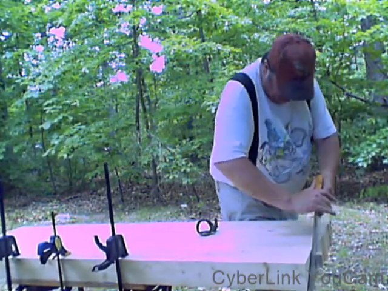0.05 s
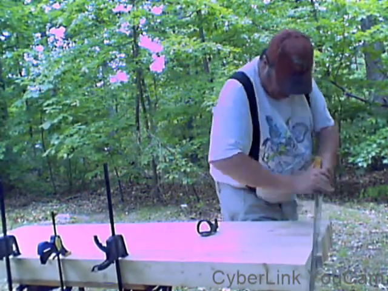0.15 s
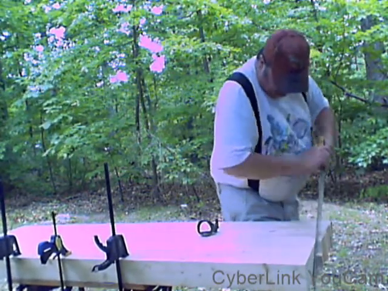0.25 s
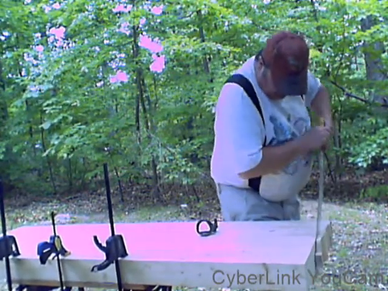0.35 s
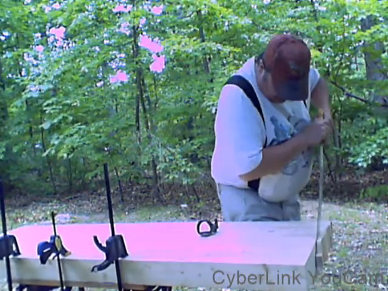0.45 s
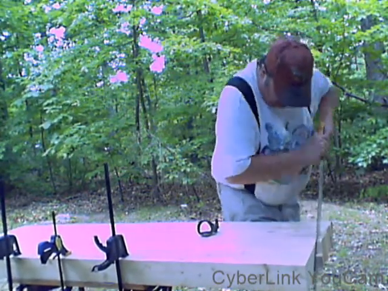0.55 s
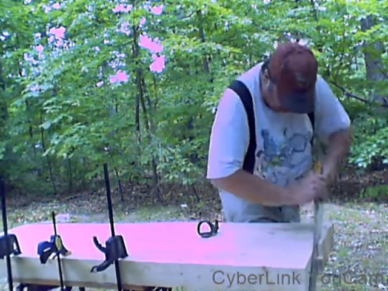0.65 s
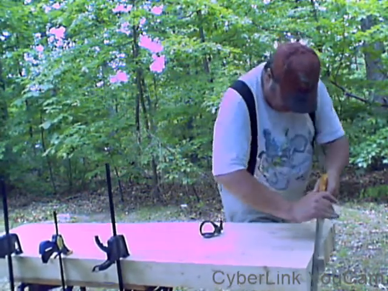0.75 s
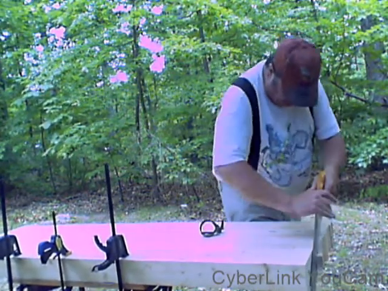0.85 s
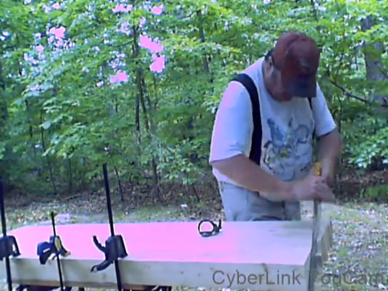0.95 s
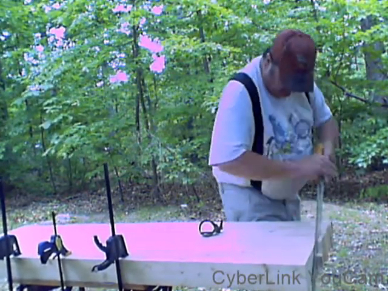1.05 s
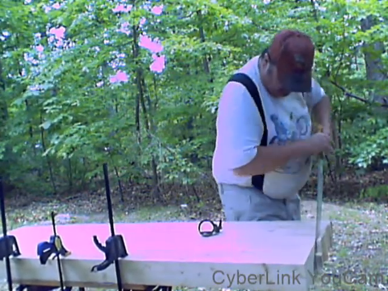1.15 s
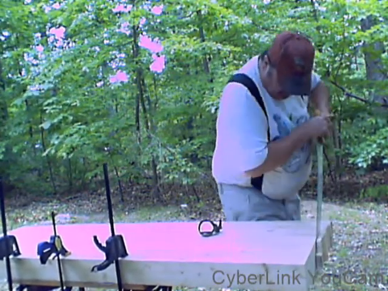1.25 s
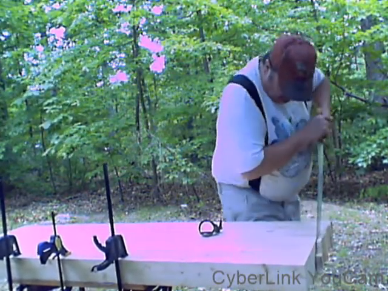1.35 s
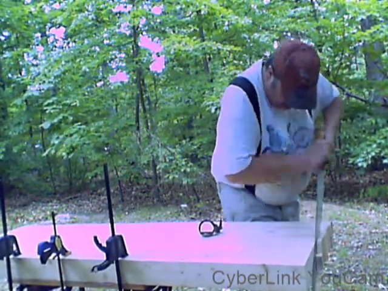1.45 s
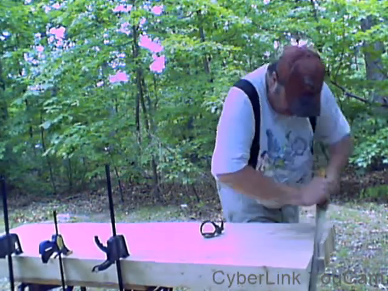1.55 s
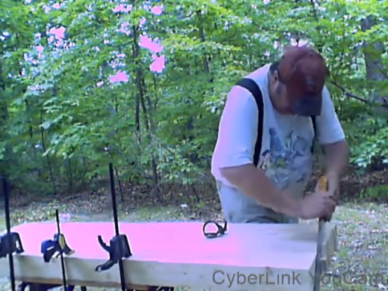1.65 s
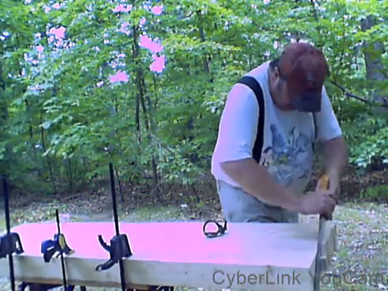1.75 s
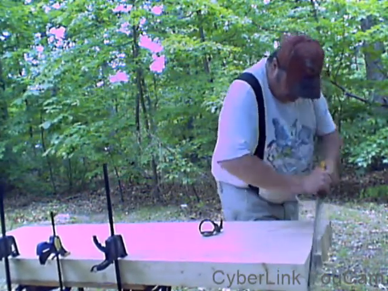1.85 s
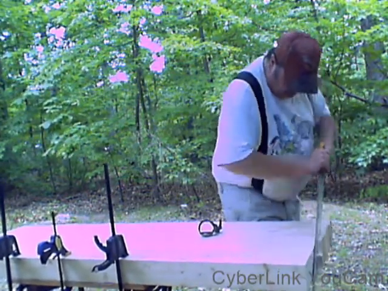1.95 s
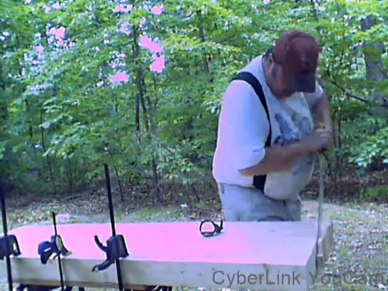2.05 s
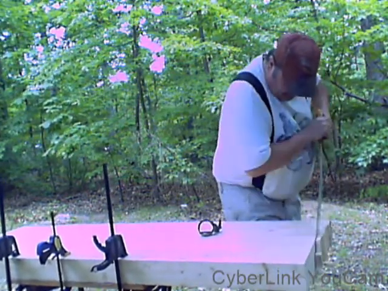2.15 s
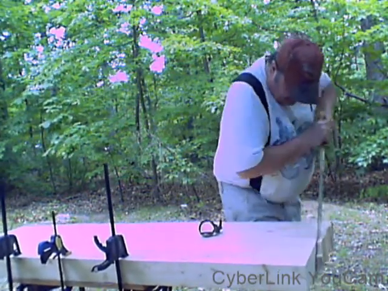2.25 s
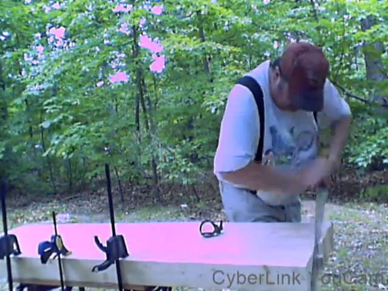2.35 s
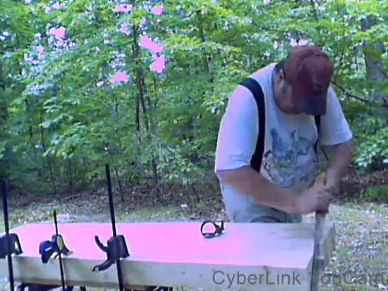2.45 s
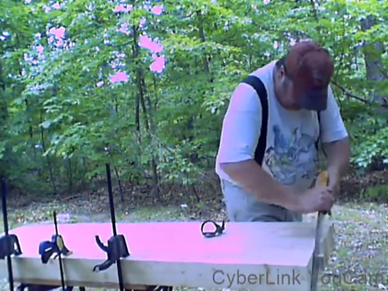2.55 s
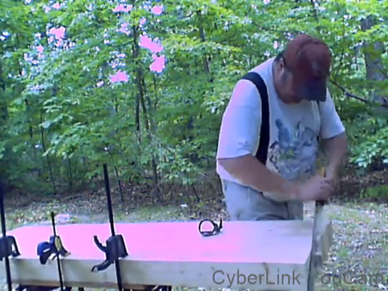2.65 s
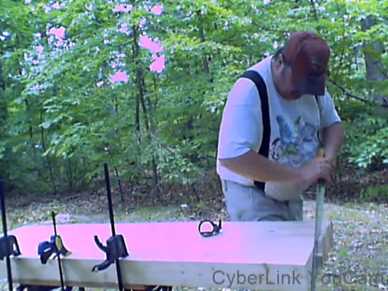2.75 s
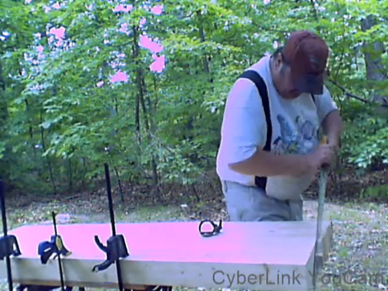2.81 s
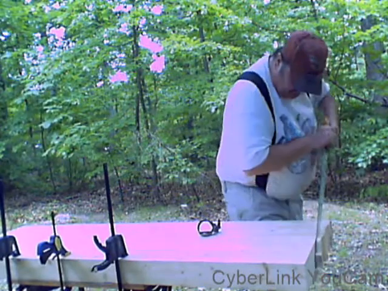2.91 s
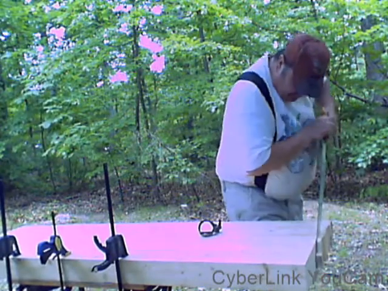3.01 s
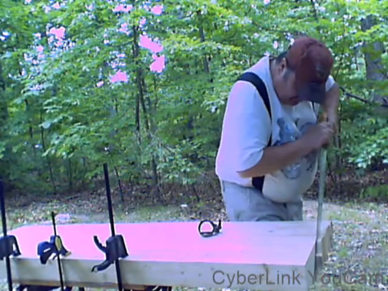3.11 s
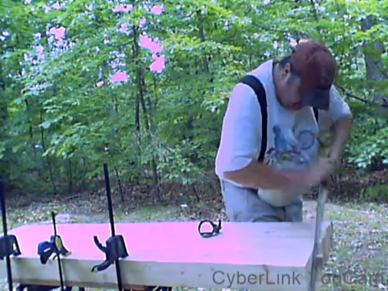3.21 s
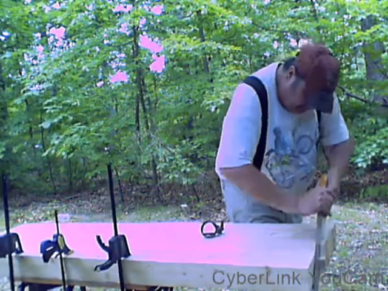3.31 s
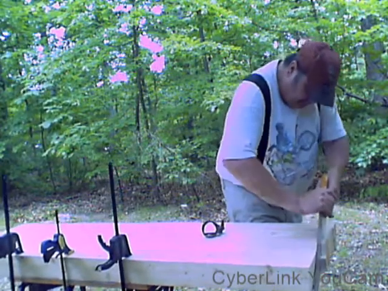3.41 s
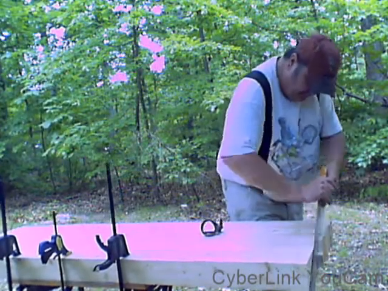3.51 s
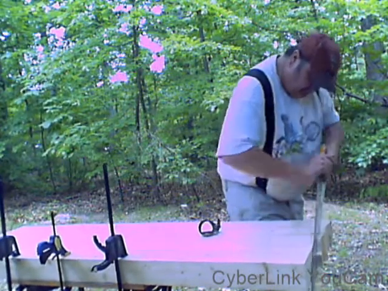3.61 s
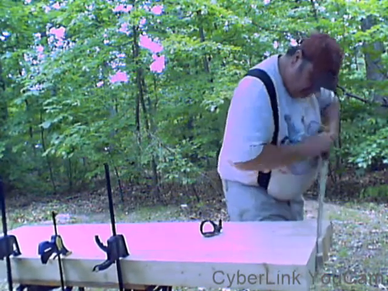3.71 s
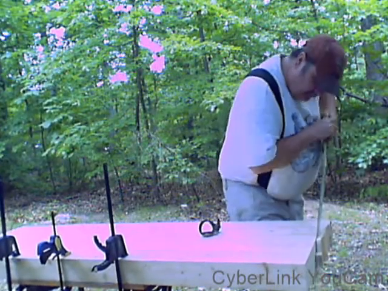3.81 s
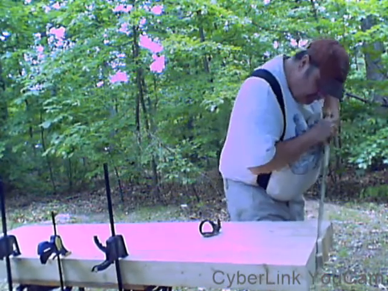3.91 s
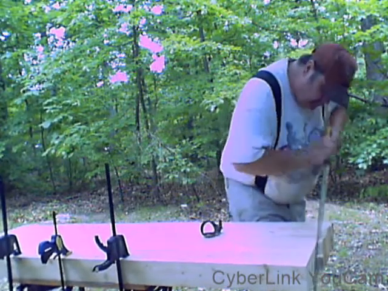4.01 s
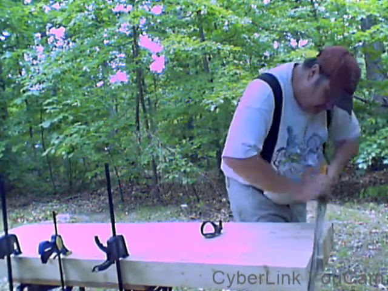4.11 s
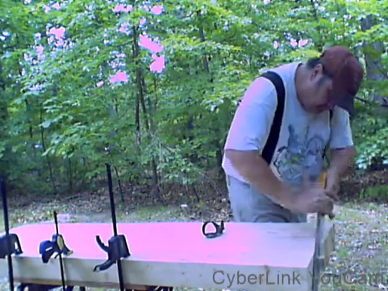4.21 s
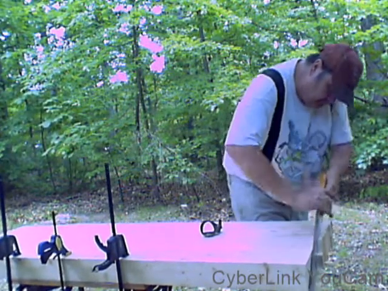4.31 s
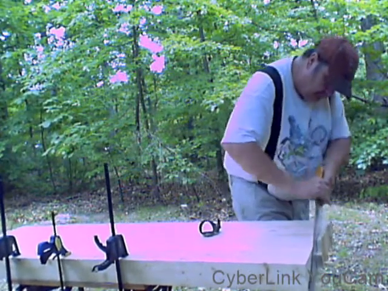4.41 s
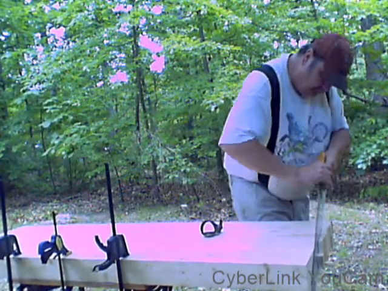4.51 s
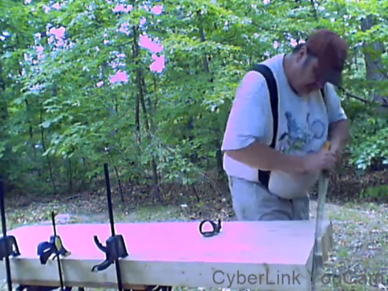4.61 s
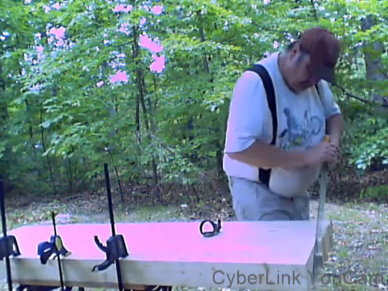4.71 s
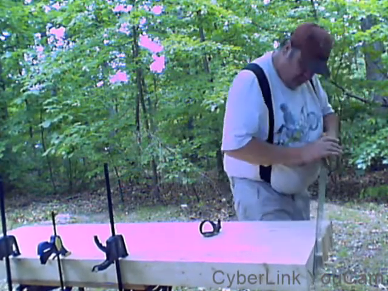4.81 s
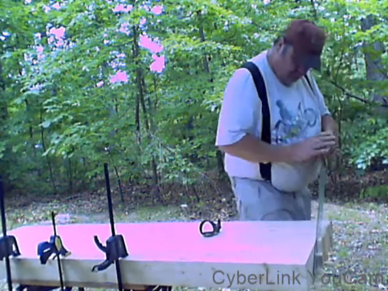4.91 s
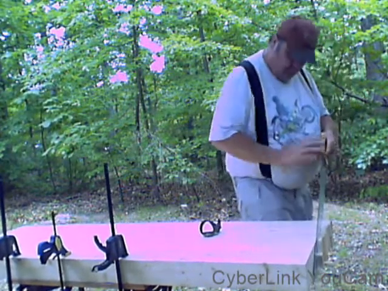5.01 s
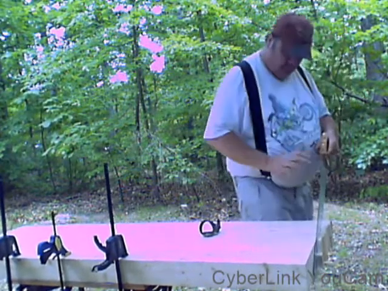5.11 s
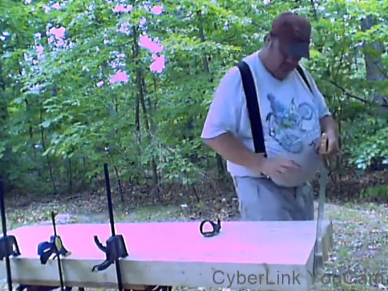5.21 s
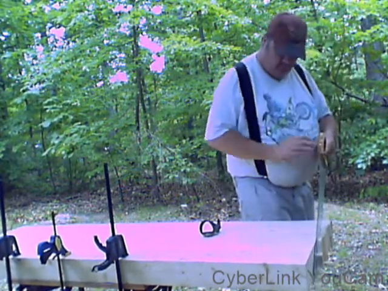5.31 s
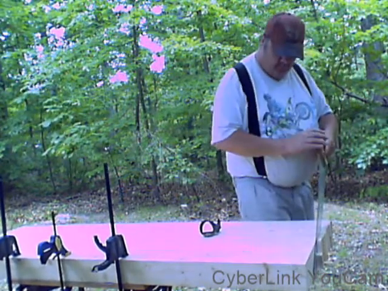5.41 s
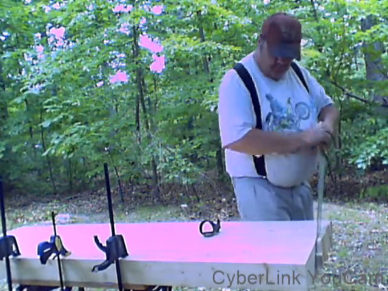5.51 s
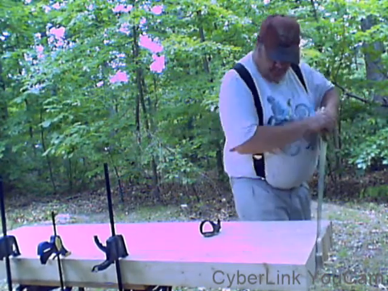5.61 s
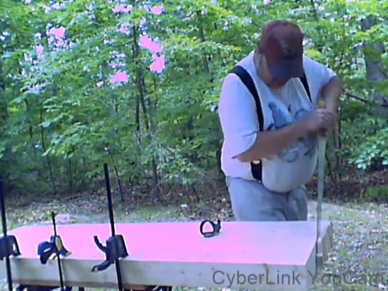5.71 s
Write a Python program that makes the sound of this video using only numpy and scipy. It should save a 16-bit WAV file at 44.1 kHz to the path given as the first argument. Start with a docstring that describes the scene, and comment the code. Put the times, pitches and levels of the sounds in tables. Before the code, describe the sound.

Over soft outdoor air noise and a low hum, a handsaw works back and forth in thick wood, a little more than once a second. Each push bites and makes the slab resonate; each pull skates back more quietly. Brief chattering tones, a few metallic knocks and two small squeaks mark the strokes. The saw stops for a moment before a last weak pull. The sound is mono, with dulled highs and almost no echo.

```python
"""A handsaw crosscuts a thick wooden slab outdoors, over steady air noise and a low hum; small mono mic.
It opens on the end of a push: teeth bite, tear fibres and set the slab ringing. On the pull they skate
back more lightly. Strokes repeat about every 0.86 s, chatter swelling into short groans of the slab.
From 0.9 s the blade knocks in the kerf at some turns, loudest at 3.6 s; near 2.3 and 4.4 s it squeaks.
At 5 s the sawyer rests briefly, then starts one more faint pull."""
import sys
import numpy as np
from scipy import signal
from scipy.fft import rfft, irfft, next_fast_len
from scipy.io import wavfile
from scipy.ndimage import uniform_filter1d

SR = 44100
rng = np.random.default_rng(int(sys.argv[2]) if len(sys.argv) > 2 else 0)


def generate_wav(sig):
    """Save sig (samples, or channels by samples) to the path in sys.argv[1] as 16-bit PCM at SR."""
    pcm = np.round(np.clip(np.atleast_2d(sig).T, -1, 1) * 32767).astype(np.int16)
    wavfile.write(sys.argv[1], SR, pcm)


N = 254012
T = np.arange(N) / SR


def from_db(db):
    """Decibels to gain."""
    return 10 ** (np.asarray(db) / 20)


def unit_rms(x):
    """Scale to rms 1."""
    return x / np.sqrt(np.mean(x ** 2) + 1e-20)


def drift(rate_hz):
    """Random wander through rate_hz knots per second; rms 1."""
    knots = rng.standard_normal(2048)
    return unit_rms(np.interp(T * rate_hz, np.arange(len(knots)), knots, period=len(knots)))


def swell(centre_s, half_s):
    """Raised-cosine rise and fall."""
    return np.cos(np.pi / 2 * np.clip((T - centre_s) / half_s, -1, 1)) ** 2


def colour(x, spectrum):
    """Filter by a curve of (frequency [Hz], level [dB]); rms 1."""
    hz, db = np.transpose(spectrum)
    size = next_fast_len(N)
    bins_hz = np.maximum(np.fft.rfftfreq(size, 1 / SR), 1)
    gain = from_db(np.interp(np.log(bins_hz), np.log(hz), db))
    return unit_rms(irfft(rfft(x, size) * gain, size)[:N])


def resonate(x, modes):
    """Parallel modes (frequency [Hz], width [Hz], level [dB]), signs alternating; rms 1."""
    out = np.zeros(N)
    for k, (hz, width_hz, db) in enumerate(modes):
        r = np.exp(-np.pi * width_hz / SR)
        mode = signal.lfilter([1, 0, -1], [1, -2 * r * np.cos(2 * np.pi * hz / SR), r * r], x)
        out += (-1) ** k * from_db(db) * (1 - r * r) / 2 * mode
    return unit_rms(out)


def ring(clicks, hz, t60_s):
    """A unit click starts a decaying sine of height 1."""
    r, w = np.exp(-np.log(1000) / (t60_s * SR)), 2 * np.pi * hz / SR
    return signal.lfilter([0, np.sin(w)], [1, -2 * r * np.cos(w), r * r], clicks + 1e-18)


# outdoor noise spectrum: (frequency [Hz], relative density [dB])
AIR_SPECTRUM = [(22, -12), (55, -5.5), (80, -12), (112, -3), (140, -12.5), (270, -18), (460, -14.5),
                (680, -16.5), (960, -21), (2000, -27), (5000, -31.5), (6400, -38), (7400, -47.5),
                (8100, -71)]
# hum tones: (frequency [Hz], rms level [dB])
HUM_TONES = [(58.5, -55), (102.3, -59)]


def background(air_db):
    """Steady outdoor noise and a low wavering hum."""
    air = from_db(air_db + 0.49 * drift(6.2)) * colour(rng.standard_normal(N), AIR_SPECTRUM)
    hum = np.zeros(N)
    for hz, db in HUM_TONES:
        amplitude = np.sqrt(2) * from_db(db + 2.6 * drift(8.3))
        hum += amplitude * np.sin(2 * np.pi * hz * T + .7 * drift(7))
    return air + hum


def stroke_motion(strokes, shapes, teeth_per_stroke, floor_hz, turn_s=.009):
    """Tooth rate arches with blade speed; each layer's gain has attack, sagging hold and release."""
    rate_hz, gains = np.zeros(N), np.zeros((len(shapes), N))
    for start_s, rise_s, hold_s, fall_s, sag_db, *levels_db in strokes:
        length_s = rise_s + hold_s + fall_s
        during = (T > start_s) & (T < start_s + length_s)
        t = T[during] - start_s
        arch = 8 / np.pi * np.sqrt(abs(t * (length_s - t))) / length_s   # mean 1
        rate_hz[during] = teeth_per_stroke / length_s * arch
        for gain, db, shape in zip(gains, levels_db, shapes):
            attack_share, attack_db, sag_share, extra_s, release_db = shape
            corners_s = [0, attack_share * rise_s, rise_s + hold_s + extra_s, length_s]
            drops_db = [attack_db, 0, sag_share * sag_db, sag_share * sag_db + release_db]
            gain[during] += from_db(db - np.interp(t, np.maximum.accumulate(corners_s), drops_db))
    return np.maximum(rate_hz, floor_hz), uniform_filter1d(gains, size=round(turn_s * SR))


def teeth(rate_hz, wobble, uneven_db, set_db, tear_db, snaps_per_s, snap_spread_db):
    """Force at the tooth line: each tooth strikes the wood, then fibres snap as it ploughs on."""
    travel = np.cumsum(rate_hz * (1 + wobble * drift(140) + wobble * drift(22))) / SR
    tooth = travel.astype(int)
    # no two teeth bite alike; they are set left and right in turn
    bite = from_db(uneven_db * rng.standard_normal(N)[tooth] + set_db * (-1) ** (tooth % 2))
    strikes = np.diff(tooth, prepend=0) * bite / np.sqrt(rate_hz)
    sizes = from_db(snap_spread_db * np.minimum(rng.exponential(1, N), 4)) * rng.choice([-1, 1], N)
    snapping = rng.random(N) < snaps_per_s / SR
    snaps = sizes * snapping * bite * np.exp(-(travel % 1))
    return unit_rms(strikes - strikes.mean()), from_db(tear_db) * unit_rms(snaps)


def disperse(x, lag_at_1khz_s):
    """Higher bending waves travel faster, smearing each click."""
    size = next_fast_len(N)
    phase = 4 * np.pi * lag_at_1khz_s * np.sqrt(1000 * np.fft.rfftfreq(size, 1 / SR))
    return irfft(rfft(x, size) * np.exp(-1j * phase), size)[:N]


# pushes: (start [s], rise [s], hold [s], fall [s], sag [dB], then relative levels:
# rasp [dB], slab ring [dB], judder [dB])
PUSH_STROKES = [(-.29, .16, 0.095, .14, 6.5, -21, -23.5, -33.5),
                (.565, 0.16, 0.099, .13, 10.5, -16, -19, -31.5),
                (1.415, .18, 0.093, 0.11, 5.5, -16.5, -19, -34.5),
                (2.3, .16, .085, 0.13, 8.5, -14.5, -19.5, -33),
                (3.15, .155, 0.1, .14, 3, -18.5, -20.5, -30.5), (3.995, .15, 0.11, .14, 2, -20, -18.5, -31)]
# envelopes; rows: rasp (follows blade speed), ring (arm leans in), judder (while the teeth grip):
# (attack [share of rise], attack depth [dB], sag [share], extra hold [s], release depth [dB])
PUSH_ENVELOPES = [(0.99, 34.5, 1.0, 0.0017, 29.5), (1.07, 25.5, 0.13, 0.035, 46.5),
                  (0.4, 22.5, -0.021, 0.054, 26)]
# rasp of cutting teeth: (frequency [Hz], relative density [dB])
CUT_SPECTRUM = [(200, -10.5), (600, -15.5), (1100, 2.5), (1600, 0.5), (2300, 0), (3050, -1), (3700, -4),
                (4800, -4.5), (5600, -5.5), (6500, -12), (7400, -15), (8200, -41.5)]
# slab under the teeth: (frequency [Hz], width [Hz], push weight [dB], pull weight [dB])
SLAB_MODES = [(177, 68, -20.5, -3.5), (360, 98, -5.5, 3.5), (483, 86, -0.5, -0.5), (594, 36, 1.5, 5),
              (680, 75, -1, 1.5), (862, 69, 0.5, 7), (987, 63, -3.5, 0.5), (1127, 29, -12.5, -5.5),
              (1209, 28, -3.5, -8.5), (1450, 51, -14, 3.5), (2557, 60, -14, -20)]
# whole slab bending on its supports: (frequency [Hz], width [Hz], weight [dB])
BENDING_MODES = [(161, 38, -8), (189.8, 15.6, -2), (276, 24.5, -1.5)]


def pushes():
    """The teeth dig in: a coarse rasp, the slab ringing and juddering under it."""
    rate_hz, (rasp, wood, judder) = stroke_motion(PUSH_STROKES, PUSH_ENVELOPES,
                                                  teeth_per_stroke=180, floor_hz=200.4)
    strikes, snaps = teeth(rate_hz, wobble=.025, uneven_db=1.5, set_db=0.3,
                           tear_db=5.5, snaps_per_s=16000, snap_spread_db=1.5)
    grain = from_db(0.84 * drift(60))   # hard and soft growth rings
    modes = [(hz, width_hz, db) for hz, width_hz, db, _ in SLAB_MODES]
    slab = from_db(-0.48) * resonate(strikes + from_db(1.0) * snaps, modes)
    cutting = from_db(1.5) * colour(from_db(-2.5) * strikes + snaps, CUT_SPECTRUM)
    cutting = disperse(cutting, lag_at_1khz_s=.006)
    bending = from_db(1.5) * resonate(from_db(-5) * strikes + snaps, BENDING_MODES)
    return grain * (rasp * cutting + wood * slab + judder * bending)


# pulls: (start [s], rise [s], hold [s], fall [s], sag [dB], relative rasp [dB], relative ring [dB])
PULL_STROKES = [(.08, .2, .12, 0.16, 2.5, -25, -28), (.94, 0.15, .18, 0.13, 1, -27.5, -30.5),
                (1.8, .185, .15, .175, -1.5, -28.5, -29), (2.68, .16, .16, .14, 5, -25.5, -27.5),
                (3.55, .15, .155, .1, 2, -26.5, -29), (4.4, 0.13, .11, .33, -0.5, -31.5, -32),
                (5.55, 0.074, .13, 0.34, 7.5, -38, -40)]
# envelopes; rows: rasp, ring:
# (attack [share of rise], attack depth [dB], sag [share], extra hold [s], release depth [dB])
PULL_ENVELOPES = [(1.0, 21, 0.98, 0.0016, 25.2), (0.76, 26.4, 0.46, .04, 24)]
# rasp of skating teeth: (frequency [Hz], relative density [dB])
SKATE_SPECTRUM = [(200, -15.5), (600, 0), (1100, 2), (1600, 1.5), (2300, 0), (3050, 0), (3900, -3.5),
                  (5200, -3.5), (6300, -9.5), (7200, -16), (8200, -52)]


def pulls():
    """The backs of the teeth skate over the wood: a finer, lighter rasp and ring."""
    rate_hz, (rasp, wood) = stroke_motion(PULL_STROKES, PULL_ENVELOPES,
                                          teeth_per_stroke=250, floor_hz=300)
    strikes, snaps = teeth(rate_hz, wobble=.03, uneven_db=0.5, set_db=0.0,
                           tear_db=8.0, snaps_per_s=22000, snap_spread_db=1.6)
    grain = from_db(0.74 * drift(60))
    modes = [(hz, width_hz, db) for hz, width_hz, _, db in SLAB_MODES]
    slab = from_db(-1.5) * resonate(strikes + snaps, modes)
    skating = from_db(0.98) * colour(from_db(-5.5) * strikes + snaps, SKATE_SPECTRUM)
    return grain * (rasp * skating + wood * slab)


# chatter tones: (centre [s], half length [s], pitch [Hz], top rms level [dB])
CHATTER_TONES = [(0.216, 0.04, 696, -31.5), (.30, 0.05, 670, -28), (0.754, 0.037, 983, -17),
                 (1.523, 0.05, 175, -37.5), (1.655, 0.036, 495, -18.5), (2.357, 0.057, 163, -35),
                 (2.491, 0.02, 489, -18.5), (2.815, 0.031, 650, -31), (3.242, 0.037, 162.2, -25.5),
                 (3.308, 0.062, 187.7, -31), (3.407, 0.14, 192, -39), (3.761, 0.029, 686, -26),
                 (3.822, .025, 999, -29), (3.899, 0.05, 1000, -38), (4.169, 0.087, 187, -20.5),
                 (4.17, .02, 2535, -26), (4.259, .025, 488.7, -19.5), (4.55, 0.032, 175.7, -30.5)]


def groans(waver):
    """The saw chatters in step with a slab mode, swelling into a short tone."""
    wavering_s = np.cumsum(1 + waver * drift(40)) / SR
    return np.sqrt(2) * sum(from_db(db) * swell(centre_s, half_s) * np.sin(2 * np.pi * hz * wavering_s)
                            for centre_s, half_s, hz, db in CHATTER_TONES)


# blade hits on the kerf: (time [s], relative level [dB])
KERF_HITS = [(0.9303, -26.5), (1.4097, -29), (1.7986, -26.5), (2.3375, -24), (3.5779, -11.5)]
# steel blade: (frequency [Hz], weight [dB], t60 [s])
BLADE_MODES = [(673, -1, .09), (1360, -8, 0.071), (1900, -4, 0.12), (2210, -4.5, 0.28), (2150, -7.5, .14),
               (2880, -3, .08), (3230, -4.5, 0.087), (4086, -8, 0.092), (4570, -15, 0.072),
               (5130, -9.5, 0.039), (5540, -19, 0.07)]


def knocks(ring_db, crack_db, crack_decay_s):
    """The blade slaps the side of the kerf: a short crack and a damped steel ring."""
    clicks = np.zeros(N)
    for time_s, db in KERF_HITS:
        clicks[round(time_s * SR)] = from_db(db)
    steel = sum((-1) ** k * from_db(db) * ring(clicks, hz, t60_s)
                for k, (hz, db, t60_s) in enumerate(BLADE_MODES))
    decay = signal.lfilter([1], [1, -np.exp(-1 / (crack_decay_s * SR))], clicks + 1e-18)
    crack = decay * colour(rng.standard_normal(N), CUT_SPECTRUM)
    return from_db(ring_db) * steel + from_db(crack_db) * crack


# stick-slip: (centre [s], half length [s], slip rate [Hz], top rms level [dB], steel resonance [Hz])
BLADE_SLIPS = [(2.255, 0.032, 797, -43.5, 5580), (4.347, 0.0078, 872, -35.5, 5280),
               (4.435, 0.034, 840, -42, 2530), (4.447, 0.038, 846, -41.5, 5060)]


def squeaks(waver, width_hz, overtone_floor_db):
    """The turning blade sticks and slips; the overtone nearest a steel resonance stands out."""
    out = np.zeros(N)
    harmonic = np.arange(2, 10)[:, None]
    for centre_s, half_s, hz, db, steel_hz in BLADE_SLIPS:
        during = abs(T - centre_s) < half_s
        phase = 2 * np.pi * np.cumsum(hz * (1 + waver * drift(180)[during])) / SR
        resonance = 1 / (1 + ((harmonic * hz - steel_hz) / width_hz) ** 2)
        weights = from_db(overtone_floor_db) * 2 / np.sqrt(harmonic) + resonance
        offsets = 2 * np.pi * rng.random(harmonic.shape)
        slips = np.sum(weights * np.sin(harmonic * phase + offsets), axis=0)
        out[during] += from_db(db) * unit_rms(slips) * swell(centre_s, half_s)[during]
    return out


# echoes off ground, table and trees: (delay [s], gain [dB])
REFLECTIONS = [(.0042, -31), (.0057, -21), (0.028, -27.5), (0.06, -26.5), (.094, -36)]


def outdoors(x):
    """Direct sound plus a few dull open-air echoes."""
    dull = signal.sosfilt(signal.butter(1, 3000, fs=SR, output="sos"), x)
    return x + sum(from_db(db) * np.interp(T - delay_s, T, dull, left=0) for delay_s, db in REFLECTIONS)


def scene():
    """Saw and surroundings, the same in both channels."""
    wood = pushes() + pulls() + groans(waver=0.0192)
    steel = knocks(ring_db=-14.0, crack_db=-13.0, crack_decay_s=0.011)
    steel += squeaks(waver=0.0056, width_hz=310, overtone_floor_db=-11.5)
    return np.tile(outdoors(wood + steel) + background(air_db=-41.5), (2, 1))


def record(dry):
    """Narrow-band microphone: rounded peaks, steep low-pass."""
    ceiling, cutoff_hz = .85, 8100
    rounded = dry / (1 + (dry / ceiling) ** 4) ** .25
    return signal.sosfilt(signal.ellip(12, .1, 90, cutoff_hz, fs=SR, output="sos"), rounded)


dry = scene()
out = record(dry)
generate_wav(out)
```